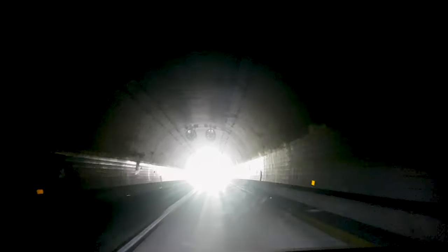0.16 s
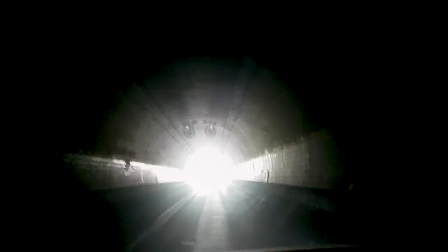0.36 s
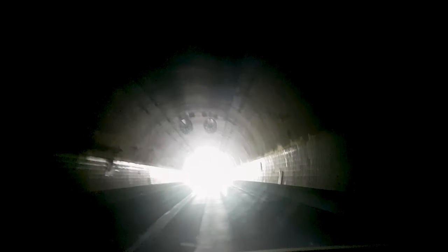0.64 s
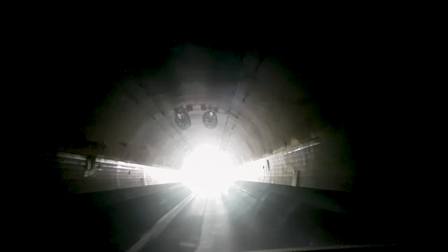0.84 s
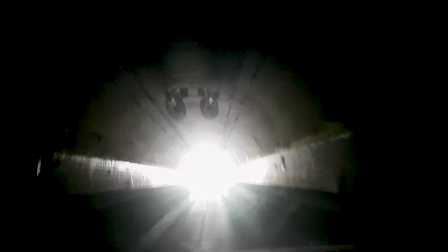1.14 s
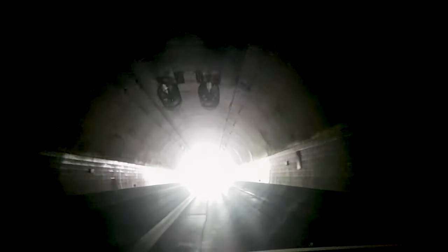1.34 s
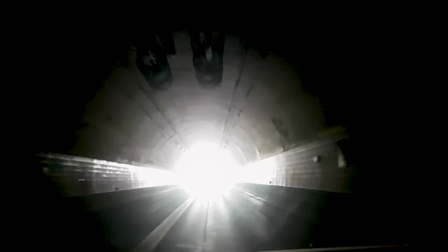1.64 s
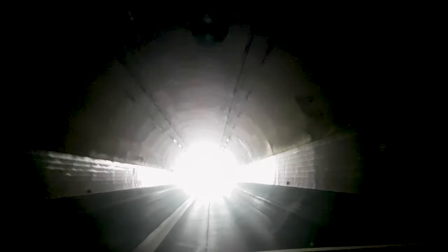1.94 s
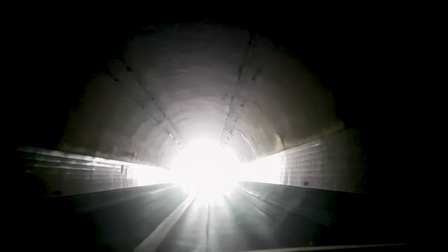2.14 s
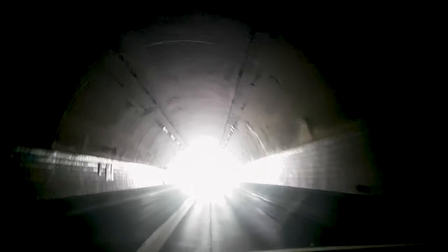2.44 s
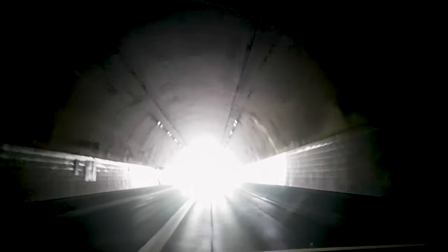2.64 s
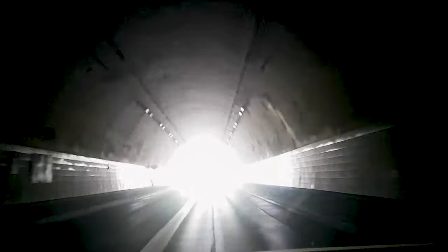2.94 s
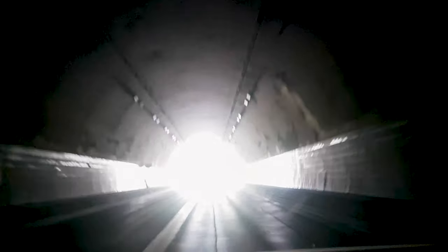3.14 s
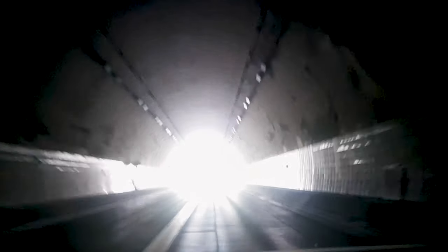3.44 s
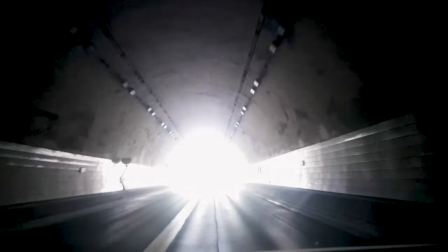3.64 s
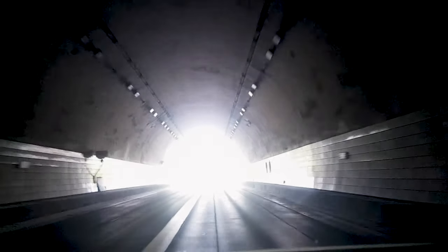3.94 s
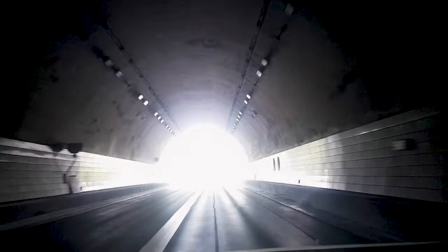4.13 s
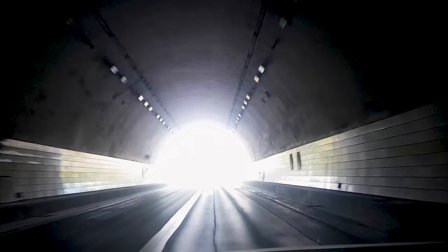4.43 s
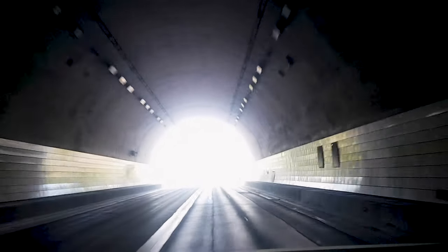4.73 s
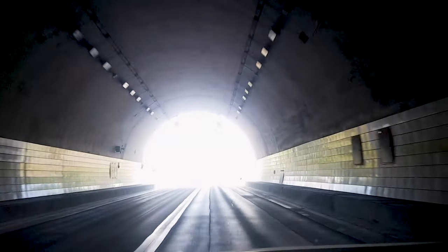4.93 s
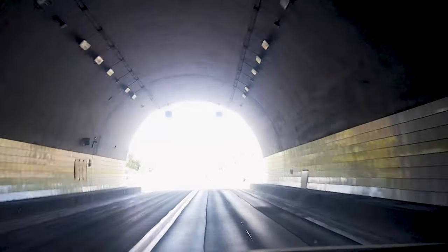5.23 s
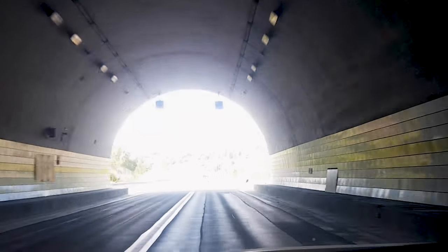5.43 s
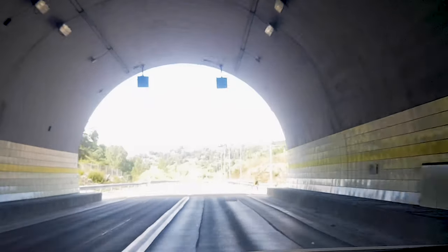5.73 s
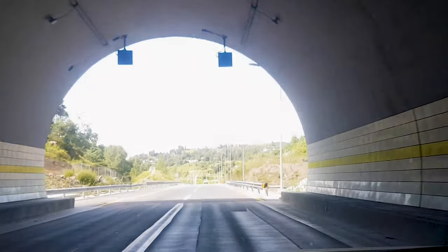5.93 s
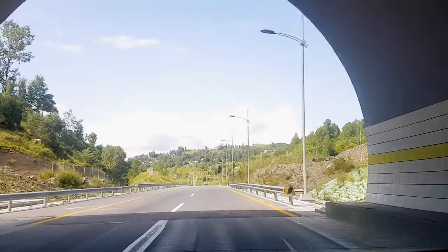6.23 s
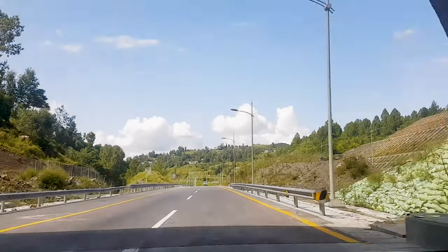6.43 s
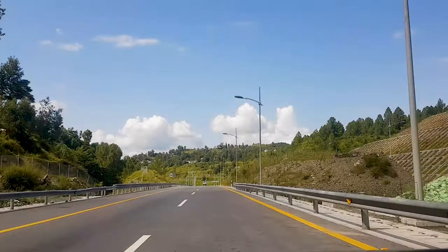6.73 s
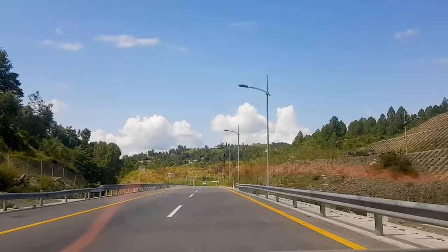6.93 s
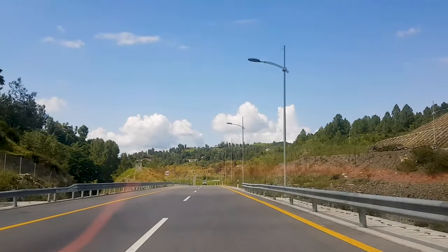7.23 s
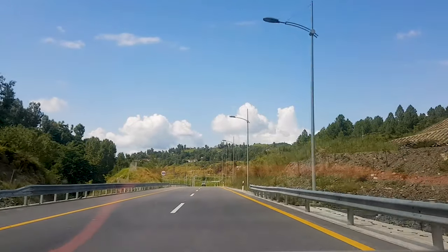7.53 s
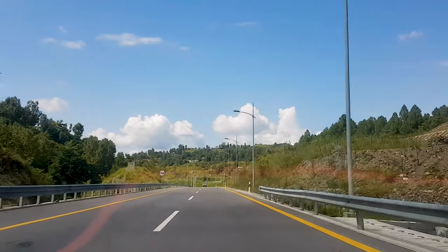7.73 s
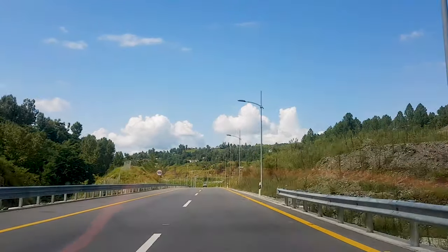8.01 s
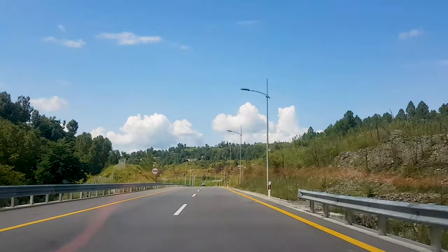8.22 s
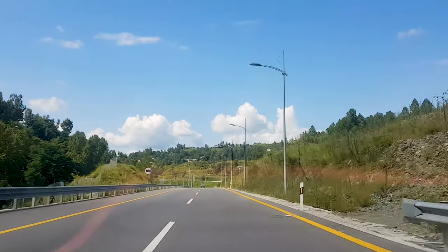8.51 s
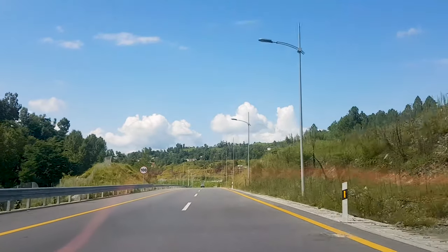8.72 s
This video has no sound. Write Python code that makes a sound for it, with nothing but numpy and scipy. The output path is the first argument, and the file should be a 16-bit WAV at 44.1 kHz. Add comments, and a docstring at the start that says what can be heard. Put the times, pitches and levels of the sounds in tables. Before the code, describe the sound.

A car drives through a road tunnel, heard from inside. It opens with a split second of rough engine drone, cut off by a click. Then echoing tyre roar takes over, with a steady low rumble, a wavering tread whine and a faint engine hum that swells and sinks. A thinner, higher whine flares now and then and gradually weakens. Wind buffets the microphone throughout, mostly on the right, with hard slaps and thuds around 1.3 seconds, from 3 to 3.6, from 4.3 to 5.3, near 5.8 and around 7. Just before 7 seconds the car leaves the tunnel, and the roar and whines die away quickly. The wind continues over a softer rush of tyres. From about 7.5 seconds the road sounds rougher and boomier, and at 8.5 a gust makes a sharp double crack on the right.

```python
"""A car drives out of a motorway tunnel, heard from inside with the air beating at the right-hand side.
First comes a split second of lower engine drone: rough harmonics over air noise, ended by a click.
Then shaped noise makes the tunnel's tyre roar, and wavering tones make its thin whines and the engine hum.
Wind noise buffets throughout, and pressure pulses slap the microphone.
Past the portal the roar and whines fall away; the wind carries on, the road turns rougher, an eddy cracks."""
import sys
import numpy as np
from scipy.fft import rfft, irfft, next_fast_len
from scipy.io import wavfile
from scipy.ndimage import uniform_filter1d, minimum_filter1d, map_coordinates

SR = 44100
rng = np.random.default_rng(int(sys.argv[2]) if len(sys.argv) > 2 else 0)


def persist_wave(psi):
    """Save psi, clipped to +-1, as 16-bit WAV."""
    counts = np.round(np.clip(psi, -1, 1) * 32767).astype(np.int16)
    wavfile.write(sys.argv[1], SR, np.atleast_2d(counts).T)


N = 391166  # length [samples]
DRONE_END_S, PORTAL_S = 0.06, 6.84


def amp(db):
    """Decibels to gain."""
    return 10 ** (np.asarray(db) / 20)


def unit(pair):
    """Scale a stereo pair so that its centre has rms 1."""
    return pair / np.sqrt(np.mean(pair.mean(0) ** 2) + 1e-20)


def steadied(pair, size):
    """Even out the slow drift of a layer's level over size samples, leaving its fast flutter."""
    power = uniform_filter1d((pair ** 2).mean(0), size=size)
    return pair / np.sqrt(np.abs(power) + 1e-20)


def along(points, hz):
    """Read (frequency [Hz], value) points on a log frequency axis."""
    f, v = np.transpose(points)
    return np.interp(np.log(hz + 1), np.log(f + 1), v)


def clock():
    """The time of every sample [s]."""
    return np.arange(N) / SR


def curves(rows):
    """One value per sample for each column after the time."""
    s, *cols = np.transpose(rows)
    return [np.interp(clock(), s, c) for c in cols]


def swell(at_s, half_s):
    """A bell-shaped rise and fall that peaks at 1."""
    return np.exp(-((clock() - at_s) / half_s) ** 2)


def ramp(at_s, length_s):
    """A straight rise from 0 to 1, centred on a moment."""
    return np.clip((clock() - at_s) / length_s + .5, 0, 1)


def wobble(rate):
    """A smooth random curve with rate knots a second."""
    coarse = np.arange(0, N + 32, 32)  # every 32nd sample is enough
    knots = rng.standard_normal(4096)
    curve = map_coordinates(knots, [coarse * rate / SR], mode="wrap")
    return np.interp(np.arange(N), coarse, curve)


def filtered(x, response):
    """Shape x by a response of frequency."""
    size = next_fast_len(N + SR // 4)
    spectrum = rfft(x, size) * response(np.fft.rfftfreq(size, 1 / SR))
    return irfft(spectrum, size)[..., :N]


def sides(balance_db):
    """Left and right gains for a left-minus-right level difference."""
    left = amp(balance_db)
    return np.array([left, np.ones_like(left)]) / np.sqrt(1 + left ** 2)


# peaks and hollows in the cabin's colour: (centre [Hz], width [Hz], gain [dB])
CABIN_COLOUR = [(750, 26, 1.5), (1177, 57, -2), (1533, 42, -2.5), (1590, 24, 1.5), (1900, 27, 1),
                (2160, 40, -1), (2316, 45, 2)]


def cabin(hz):
    """Bell-shaped peaks and hollows that colour noise in the cabin, in dB."""
    return sum(db * np.exp(-((hz - centre) / width) ** 2) for centre, width, db in CABIN_COLOUR)


# the left side is shaded from the open air: (frequency [Hz], left minus right [dB])
LEFT_SHADE = [(40, -4), (90, -4), (140, -7.5), (220, -2), (330, -9.5), (550, -8), (950, -11.5),
              (1300, -12.5), (2000, -19), (3000, -21), (4000, -27.5), (6000, -30)]
# how alike the two sides are: (frequency [Hz], likeness [0 to 1])
SIDE_LIKENESS = [(30, 1), (70, 0.77), (250, 0.63), (600, 0.54), (1000, 0.3), (2000, .22), (4000, 0.078)]
LEFT_LAG_S = 0.00041  # sound from the right reaches the left port this much later


def rush(spectrum, shade=1):
    """Stereo noise in the cabin: bass alike on both sides, later on the left and, by shade, weaker there."""
    def mid_side(hz):
        turn = np.arccos(np.clip(along(SIDE_LIKENESS, hz), -1, 1)) / 2
        return amp(along(spectrum, hz) + cabin(hz)) * [np.cos(turn), np.sin(turn)]

    def ports(hz):
        delay = np.exp(-2j * np.pi * hz * np.array([[LEFT_LAG_S], [0]]))
        return sides(shade * along(LEFT_SHADE, hz)) * delay

    mid, side = filtered(rng.standard_normal((2, N)), mid_side)
    return unit(filtered(np.array([mid + side, mid - side]), ports))


def echoed_tone(pitch, fade_rate, steady, spread_rate, spread_db, balance_db, lead):
    """A tone among moving walls: its echoes beat slowly, and Doppler-shifted far ones fray the line.

    Random complex gains stand for the echoes; lead is the left side's phase offset [rad].
    """
    def scatter(rate):
        return wobble(rate) + 1j * wobble(rate)

    shared = steady + scatter(fade_rate)
    far = np.array([scatter(spread_rate), scatter(spread_rate)])
    paths = shared + amp(spread_db) * far
    phase = 2 * np.pi * np.cumsum(pitch) / SR + np.array([[lead], [0]])
    tone = np.real(paths * np.exp(1j * phase))
    return unit(steadied(tone * sides(balance_db)[:, None], size=19000))


# body rumble on the road: (frequency [Hz], relative level [dB per Hz])
RUMBLE_SPECTRUM = [(10, -23), (22, -9), (32, -3), (42, 0), (62, 0), (85, 0), (110, -12), (200, -24),
                   (400, -50), (2000, -110)]
# boom of coarse asphalt: (frequency [Hz], relative level [dB per Hz])
COARSE_SPECTRUM = [(30, -13), (50, 0), (80, -2), (140, -2), (200, -6), (300, -14), (600, -47), (2000, -110)]
# even rush of tyres and air: (frequency [Hz], relative level [dB per Hz])
OPEN_SPECTRUM = [(350, -21.5), (680, 2), (770, 6.5), (860, -1.5), (1100, 3), (1400, -2.5), (1900, -2),
                 (2400, -9), (3200, -18), (5000, -26), (7000, -33.5), (9300, -52)]
RUMBLE_DB, ROUGH_ROAD_S, ROUGH_ROAD_DB = -31, 7.57, 2.5  # the rumble lifts on the rougher road outside


def road(open_db=-46.0, change_s=.08, uneven_db=0.5, coarse_db=-32, rumble_shade=.15):
    """The body rumbles on the road and booms on coarser asphalt outside, under a rush of tyres and air."""
    rough = ramp(ROUGH_ROAD_S, change_s)
    rumble_db = RUMBLE_DB + ROUGH_ROAD_DB * rough + uneven_db * wobble(4.2)
    rumble = amp(rumble_db) * unit(steadied(rush(RUMBLE_SPECTRUM, rumble_shade), size=6000))
    boom = amp(coarse_db) * rough * rush(COARSE_SPECTRUM, rumble_shade)
    open_rush = amp(open_db + 0.74 * wobble(8.7)) * rush(OPEN_SPECTRUM)
    return rumble + boom + open_rush


def opening_drone(pitch_hz=156, air_db=-42, waver=0.018):
    """A lower, rough engine note: four harmonics of one wavering pitch over a little air noise."""
    harmonics_db = [-27, -32, -34, -33]
    turns = np.cumsum(pitch_hz * (1 + waver * wobble(79))) / SR
    note = np.zeros(N)
    for k, db in enumerate(harmonics_db, 1):
        sine = np.sqrt(2) * np.sin(2 * np.pi * (k * turns + rng.random()))
        note += amp(db + 2.6 * wobble(89)) * sine
    air = rush([(60, -11.5), (400, -12.0), (900, -3.0), (1700, -5.0), (4000, -11.5),
                (5200, -29), (7300, -36), (9000, -39), (15000, -52)])
    return note * sides(-5.5)[:, None] + amp(air_db) * air


def tick(tick_db=-15.5, lead_s=0.0035):
    """A thin, bright click just as the opening drone stops: one impulse through a treble colour."""
    impulse = np.zeros(N)
    impulse[round((DRONE_END_S - lead_s) * SR)] = amp(tick_db)
    colour = [(800, -11), (2500, 10.0), (6000, 1.5), (15000, -8.5)]
    return filtered(impulse, lambda hz: amp(along(colour, hz)))


# engine hum, creeping upward: (time [s], pitch [Hz], level [dB])
HUM_TRACK = [(0.2, 329, -45.5), (0.7, 329, -47), (1.15, 330, -39.5), (1.95, 331, -36), (2.3, 332, -42),
             (2.6, 333, -41), (3.1, 334, -58), (3.55, 335, -42), (4.2, 336, -50.5), (5.4, 337, -48.5),
             (6.0, 338, -41.5), (7.1, 340, -40.5), (7.8, 341, -54.5)]
# engine and tyre partials that swell and sink: (time [s], half-length [s], pitch [Hz], peak level [dB])
PARTIAL_SWELLS = [(0.253, 0.45, 413, -41.5), (1.153, 0.18, 660, -45.5), (2.748, 0.43, 423, -45.5),
                  (3.15, 0.46, 668, -50), (6.402, 0.53, 902, -46.5), (8.0, 0.57, 762, -52.5)]
OCTAVE_DB = -55.5


def engine():
    """The engine's hum with its faint octave, over which single partials swell and sink."""
    def partial(hz):
        return echoed_tone(hz, fade_rate=9, steady=4, spread_rate=30, spread_db=-1, balance_db=-7, lead=0)

    hum_hz, hum_db = curves(HUM_TRACK)
    out = amp(hum_db) * partial(hum_hz) + amp(OCTAVE_DB) * partial(hum_hz * 2)
    for s, half_s, hz, db in PARTIAL_SWELLS:
        out += amp(db) * swell(s, half_s) * partial(np.full(N, hz))
    return out


# tyre roar colour: (frequency [Hz], relative level [dB per Hz])
ROAR_SPECTRUM = [(400, -26), (700, -1.5), (900, 10), (1030, 7.5), (1180, -6.5), (1500, -1), (1750, 2),
                 (2200, -0.5), (2850, -6), (3150, -13), (3900, -13.5), (5000, -21.5), (7000, -30),
                 (9300, -52)]
# tyre roar thrown back by the tunnel, before the portal fall: (time [s], level [dB])
ROAR_TRACK = [(0.1, -39), (2.9, -40), (4.4, -42), (6.5, -41)]
# tyre tread whine, before the portal fall: (time [s], pitch [Hz], level [dB])
TREAD_TRACK = [(0.15, 977.5, -40), (0.75, 975.7, -44.5), (1.4, 980, -44.5), (1.7, 971.5, -39),
               (2.15, 973, -36.5), (2.65, 976, -40), (3.3, 968, -40), (4.25, 972.4, -40.5),
               (4.43, 971, -43), (4.9, 973.4, -43.5), (5.7, 976, -38.5), (5.92, 978, -43.5),
               (6.1, 978, -44.5), (6.8, 988, -43.5)]
# thin high whine, sinking and fading, before flares and portal fall: (time [s], pitch [Hz], level [dB])
WHINE_TRACK = [(0.1, 2420, -50.5), (1.8, 2397, -49.5), (2.8, 2392, -49), (3.4, 2384, -52), (4.1, 2378, -54),
               (4.7, 2347, -54), (5.3, 2317, -59), (6.8, 2340, -61.5)]
# the high whine flares as echoes line up: (time [s], half-length [s], rise [dB])
WHINE_FLARES = [(0.214, 0.068, 5), (0.537, 0.034, 8.5), (0.8, .06, 5.5), (1.0, 0.044, 4),
                (1.32, 0.052, 7.5), (1.665, 0.12, 7), (1.88, .06, 4.5), (2.25, .06, 6.5),
                (2.85, 0.075, 5.5), (3.364, 0.04, 4), (3.903, 0.057, 9), (4.693, 0.079, 7),
                (5.333, .12, 10), (6.351, .08, 8)]
TREBLE_HZ, TREBLE_OPENING_DB = 4500, 4  # rise of the roar's treble from the start to the portal
FRAY_S, FRAY_DB = 0.77, -46.5  # near the portal the tread whine frays into a wider band
ECHO_FALL_DB_PER_S, PORTAL_DROP_DB = 49, 2  # the echo drops at the portal, then dies away


def tunnel(overtone_db=-53):
    """Roar and whines come back from the lining until the portal is passed."""
    t = clock()
    roar_db = curves(ROAR_TRACK)[0] + 0.55 * wobble(18)
    roar = amp(roar_db) * rush(ROAR_SPECTRUM)
    treble = filtered(roar, lambda hz: 1 - 1 / (1 + (hz / TREBLE_HZ) ** 8))
    roar = roar + (amp(TREBLE_OPENING_DB * (t / PORTAL_S - 0.5)) - 1) * treble

    tread_hz, tread_db = curves(TREAD_TRACK)
    whine_hz, whine_db = curves(WHINE_TRACK)
    whine_db = whine_db + sum(db * swell(s, half_s) for s, half_s, db in WHINE_FLARES)
    tread = amp(tread_db) * echoed_tone(
        tread_hz, fade_rate=20, steady=3.3, spread_rate=75, spread_db=-1, balance_db=-10, lead=2.8)
    overtone = amp(overtone_db) * echoed_tone(
        2 * tread_hz, fade_rate=45, steady=0, spread_rate=110, spread_db=-4, balance_db=-13, lead=3)
    whine = amp(whine_db) * echoed_tone(
        whine_hz, fade_rate=19, steady=1.7, spread_rate=60, spread_db=-3, balance_db=-19, lead=-1.5)
    fray = amp(FRAY_DB) * swell(PORTAL_S, FRAY_S) * echoed_tone(
        tread_hz, fade_rate=140, steady=0, spread_rate=200, spread_db=0, balance_db=-10, lead=0)

    past_s = np.maximum(t - PORTAL_S, 0)
    echo = amp(-PORTAL_DROP_DB * ramp(PORTAL_S, 0.092) - ECHO_FALL_DB_PER_S * past_s)
    # the whines need the walls close by, so they die twice as fast as the roar
    return echo * roar + echo ** 2 * (tread + overtone + whine + fray)


# low beating of the wind: (frequency [Hz], relative level [dB per Hz])
BUFFET_SPECTRUM = [(40, -40), (75, -7), (105, -3.5), (138, 2.5), (165, -3.5), (200, -0.5), (250, -6.5),
                   (320, -9), (420, -14), (600, -26.5), (1200, -74.5), (5000, -110)]
# brighter tearing of the wind: (frequency [Hz], relative level [dB per Hz])
FLUTTER_SPECTRUM = [(180, -15.5), (330, -6.5), (450, -1.5), (600, -3), (800, -6), (1100, -7), (1600, -13.5),
                    (2500, -32.5), (5000, -71.5), (9000, -90.5)]
# gusts and lulls at the window: (time [s], half-length [s], buffet rise [dB], flutter rise [dB])
WIND_GUSTS = [(0.907, 0.83, 1.5, 2), (2.551, 0.27, -1, -1), (3.28, 0.12, -1, -0.5), (3.552, 0.081, 1.5, 0),
              (4.384, 0.17, 1.5, 2.5), (5.101, 0.25, 1, 1.5), (5.84, 0.044, 5, 3), (6.2, 0.18, 0.5, 0),
              (7.05, 0.21, 2.5, 3), (7.85, 0.23, -1.5, 0), (8.6, 0.12, 2.5, -1)]
BUFFET_START_DB, FLUTTER_DB = -30.5, -42.5  # before gusts and restlessness
BUFFET_RISE_DB_PER_S = 0.0871


def wind(lump_db=1.0, tear_db=1.0, restless_db=0.74):
    """Turbulence beats at the window; the strongest lumps tear into a brighter flutter."""
    unrest_db = restless_db * wobble(9)
    buffet_db = BUFFET_START_DB + BUFFET_RISE_DB_PER_S * clock() + unrest_db
    flutter_db = FLUTTER_DB + unrest_db
    for s, half_s, buffet_rise_db, flutter_rise_db in WIND_GUSTS:
        gust = swell(s, half_s)
        buffet_db += buffet_rise_db * gust
        flutter_db += flutter_rise_db * gust
    lumps = wobble(70)  # shared, so both layers surge together
    buffet = unit(steadied(amp(lump_db * lumps) * rush(BUFFET_SPECTRUM), size=7000))
    flutter = unit(amp(tear_db * lumps + 2.0 * wobble(300)) * rush(FLUTTER_SPECTRUM))
    return amp(buffet_db) * buffet + amp(flutter_db) * flutter


# hard eddies that slap the microphone: (time [s], slap level [dB], slap centre [Hz], thud level [dB])
EDDY_SLAPS = [(0.46, -23, 550, -23), (1.272, -24, 500, -9.5), (1.365, -19, 550, -9), (1.697, -19, 550, -30),
              (3.112, -25, 550, -10.5), (3.132, -29, 500, -9), (3.467, -13.5, 600, -23),
              (3.511, -28, 500, -20), (3.528, -22, 800, -8.5), (3.553, -26, 600, -25),
              (3.603, -18, 1000, -15), (3.628, -29, 450, -9.5), (4.299, -21, 600, -16),
              (4.346, -26, 450, -17), (4.356, -10.5, 520, -24), (4.373, -20, 900, -12),
              (4.41, -22, 500, -13.5), (4.418, -22, 1100, -24), (4.433, -22, 450, -15.5),
              (4.458, -18, 700, -24), (4.772, -24, 502, -11), (4.925, -31, 450, -11),
              (5.015, -17, 650, -23), (5.115, -20, 550, -16), (5.18, -25, 507, -12), (5.28, -16, 600, -24),
              (5.778, -19, 700, -10.5), (5.8258, -14.5, 800, -11), (5.837, -15, 620, -17),
              (5.854, -17, 650, -19), (6.663, -20, 1000, -13), (6.87, -25, 550, -14),
              (6.893, -30, 450, -9.5), (7.058, -21, 500, -21), (7.069, -18, 600, -16),
              (7.089, -22, 500, -12), (7.106, -25, 450, -11.5), (7.146, -27, 500, -17),
              (8.496, -17, 600, -15), (8.501, -19, 750, -26), (8.512, -12, 700, -19), (8.52, -26, 800, -18)]
SWIRL_S = 0.0015  # time scale of the thud


def slaps():
    """Each eddy is a sharp spike of pressure inside a wide, slow swirl, almost wholly on the right."""
    def spike(u):
        return (1 - 2 * u * u) * np.exp(-u * u)

    def swing(u):
        return -3 * u / (1 + u * u) ** 2

    out, t = np.zeros(N), clock()
    for s, slap_db, slap_hz, thud_db in EDDY_SLAPS:
        near = slice(round(s * SR) - SR // 16, round(s * SR) + SR // 16)
        age = t[near] - s
        out[near] += amp(slap_db) * spike(np.pi * slap_hz * age)
        out[near] += amp(thud_db) * swing(age / SWIRL_S)
    return out * sides(-29.0)[:, None]


# the sharpest eddies crack: (time [s], peak level [dB])
CRACK_HITS = [(8.498, -27), (8.5002, -26), (8.501, -18), (8.52, -24)]
# colour of each crack: (frequency [Hz], relative level [dB per Hz])
CRACK_SPECTRUM = [(300, -14), (850, -2), (1300, -2), (1900, -1), (2400, -6), (2900, -12), (3600, -30),
                  (8000, -69)]


def crack(at_s=8.503, body_db=-35, body_t60=0.079):
    """The sharpest eddies break up in a double crack on the right, around a hollow flap."""
    impulses = np.zeros(N)
    for s, db in CRACK_HITS:
        impulses[round(s * SR)] = amp(db)

    def colour(hz):
        return amp(along(CRACK_SPECTRUM, hz))

    # dividing by the mean response gives each impulse its listed peak
    snap = filtered(impulses, colour) / colour(np.fft.rfftfreq(N, 1 / SR)).mean()
    age = clock() - at_s
    rise = np.clip(1 + age / .007, 0, 1) ** 2
    hollow = rush([(100, -18), (350, 2), (650, -3), (850, 9), (1300, -21), (3000, -45), (8000, -91)], shade=2)
    flap = rise * amp(-60 * np.abs(age) / body_t60) * hollow
    return snap * sides(-40)[:, None] + amp(body_db) * flap


# the level dips briefly: (time [s], length [s], depth [dB])
LEVEL_DIPS = [(3.11, 0.04, -1.5), (3.72, 0.397, -3), (5.79, 0.16, -2), (8.516, 0.096, -2)]
DIP_EDGE_S = 0.073


def dips():
    """Gain for road, wind, tunnel and engine, with brief dips."""
    return amp(sum(db * (ramp(s, DIP_EDGE_S) - ramp(s + length_s, DIP_EDGE_S))
                   for s, length_s, db in LEVEL_DIPS))


def scene():
    """The opening drone gives way abruptly to the drive through the tunnel; the road runs under both."""
    level = dips()
    drive = level * (wind() + tunnel() + engine()) + slaps() + crack()
    blend = ramp(DRONE_END_S, .004)
    edges = ramp(.002, .004) - ramp(N / SR - .002, .004)  # short fades at both ends
    mix = level * road() + blend * drive + (1 - blend) * opening_drone()
    return edges * mix + tick() * sides(-8)[:, None]


# microphone hiss: (frequency [Hz], relative level [dB per Hz])
HISS_SPECTRUM = [(5000, -9), (9700, -6.5), (11000, 4), (15500, 3)]
TOP_HZ = 15700  # upper band limit


def record(dry, hiss_db=-83):
    """A limiter ducks the hardest peaks; the microphone adds faint hiss and has a band limit."""
    needed = np.minimum(1, .33 / (np.abs(dry).max(0) + 1e-9))
    gain = uniform_filter1d(minimum_filter1d(needed, size=1400), size=700)
    hiss = unit(filtered(rng.standard_normal((2, N)), lambda hz: amp(along(HISS_SPECTRUM, hz))))
    return filtered(gain * (dry + amp(hiss_db) * hiss), lambda hz: hz < TOP_HZ)


dry = scene()
out = record(dry)
persist_wave(out)
```